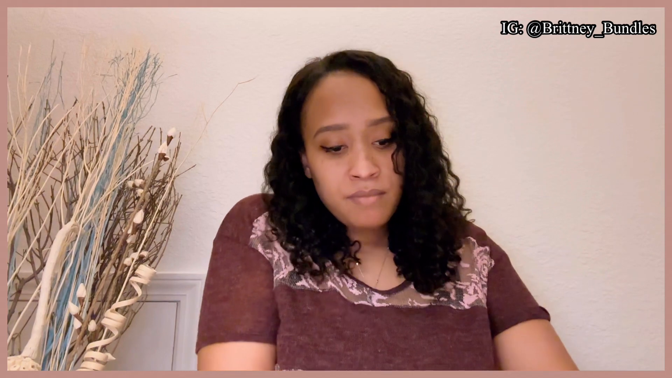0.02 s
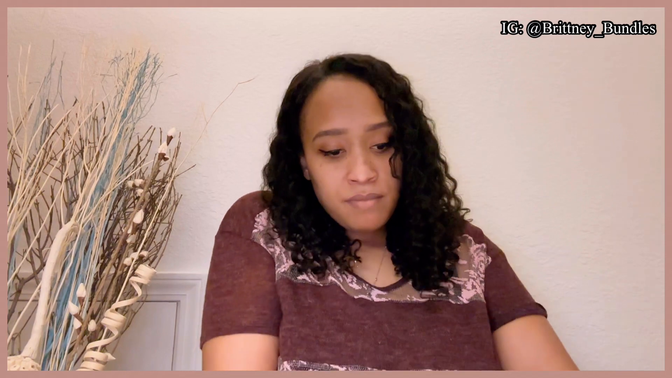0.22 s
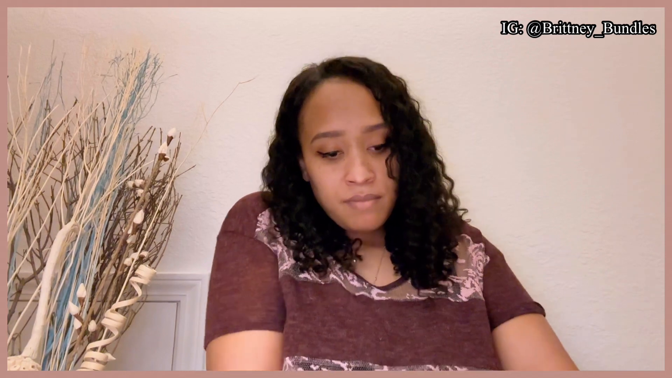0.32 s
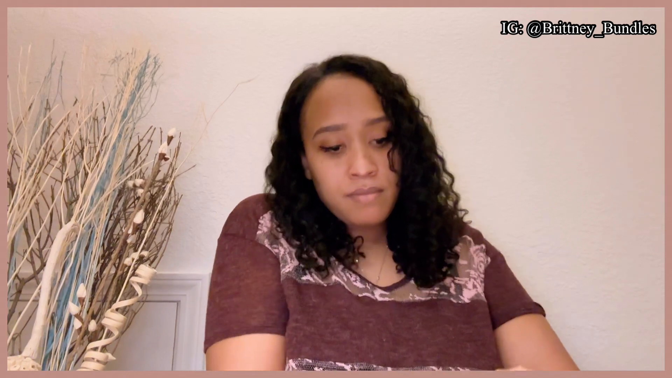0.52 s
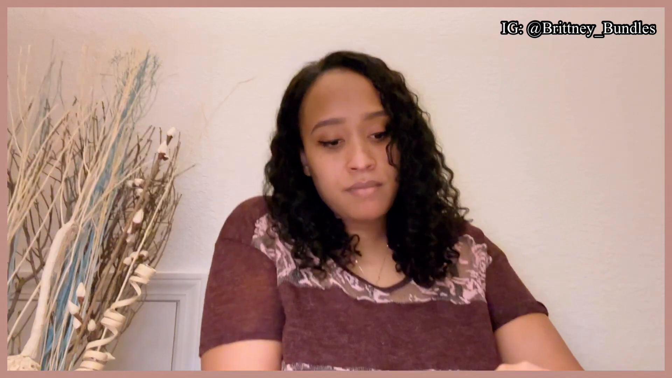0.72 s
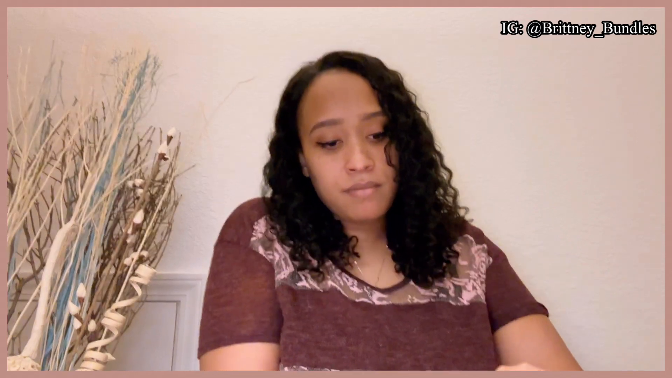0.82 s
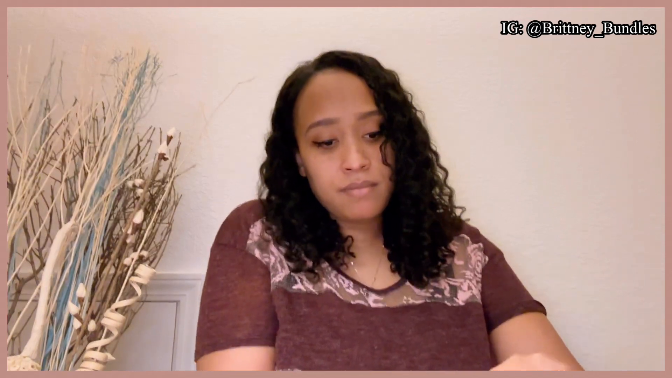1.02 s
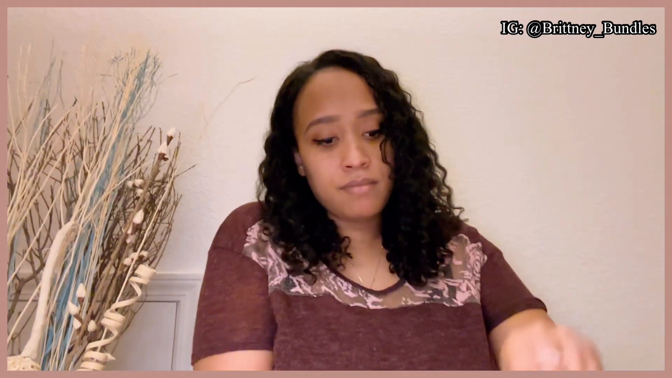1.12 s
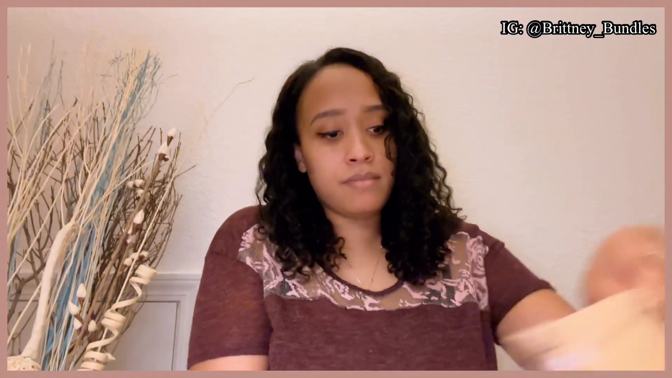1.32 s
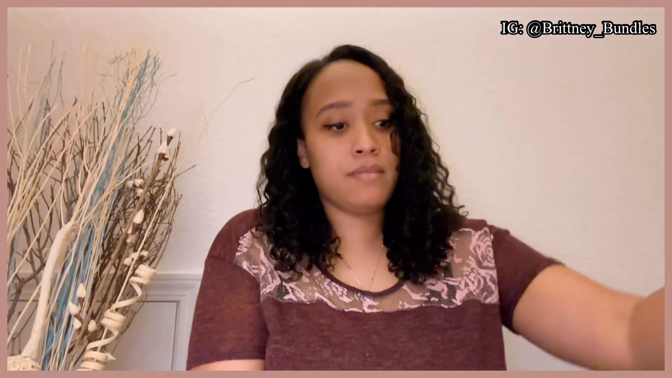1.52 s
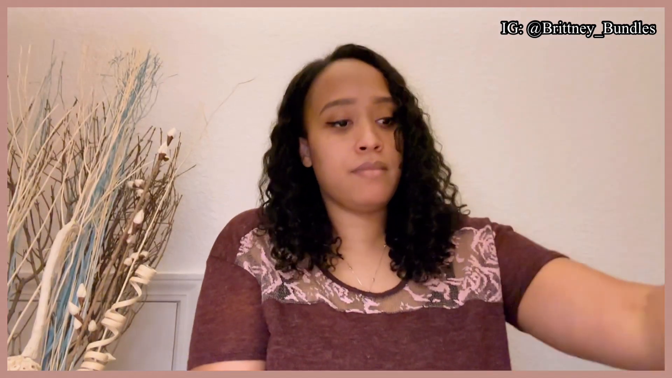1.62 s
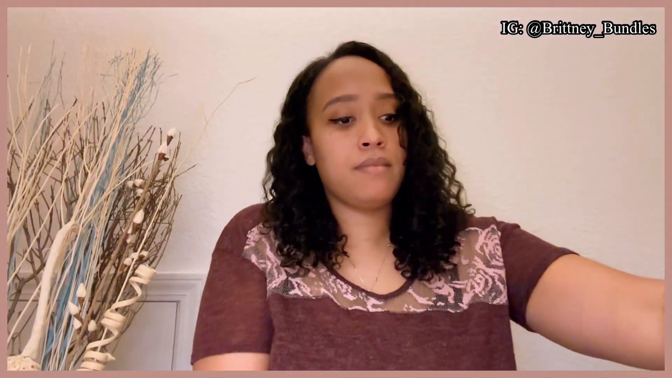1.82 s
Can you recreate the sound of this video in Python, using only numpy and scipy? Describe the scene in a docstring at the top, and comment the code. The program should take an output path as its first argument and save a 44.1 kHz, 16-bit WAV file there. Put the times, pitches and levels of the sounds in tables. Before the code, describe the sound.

Stiff paper mailer crackles: soft rustle, a burst of sharp snaps, then scattered crisp crinkles

```python
"""Soft rustle, then a burst of sharp snaps: a stiff paper mailer is bent and moved by hand on a table.
The room is small; the mailer lies off to the right of a phone with two microphone ports.
Creases snap as clicks with noise bursts, panels pop and the table thumps as damped modes;
friction grains make the rustle, a small piece of metal pings as a damped sine, steady noise is room tone.
The ports hear the paper some samples apart; decaying noise is the crackle, flutter and short wall tail."""
import sys
import numpy as np
from scipy import signal
from scipy.fft import rfft, irfft
from scipy.io import wavfile
from scipy.ndimage import map_coordinates

SR = 44100
rng = np.random.default_rng(int(sys.argv[2]) if len(sys.argv) > 2 else 0)


def to_linear_factor(level_db):
    """Convert decibel levels (scalar or array-like) to linear amplitude factors."""
    exponent = np.asarray(level_db, float) / 20
    return 10 ** exponent


def master(y):
    """Save y as 16-bit WAV."""
    cut = np.clip(np.atleast_2d(y).T, -1, 1)
    pcm = np.round(cut * 32767)  # scale
    wavfile.write(sys.argv[1], SR, pcm.astype(np.int16))


N = 83790

# creases snapping: start_s, crack_peak_db, crack_pitch_hz, treble_db (peak less TREBLE_CREST_DB)
CREASE_SNAPS = [(0.0393, -59, 4660, -68), (0.2335, -32, 1950, -60), (0.2404, -28, 3800, -51),
                (0.2445, -25, 2700, -50), (0.2455, -5.5, 5560, -22.5), (0.2577, -17, 3540, -36),
                (0.2667, -16.5, 2720, -40), (0.3458, -18, 1880, -24.5), (0.3844, -34.5, 2300, -24),
                (0.48, -53, 2770, -37.5), (0.5043, -34.5, 1950, -60), (0.556, -32.5, 3160, -72),
                (0.6182, -49, 2000, -40.5), (0.677, -38, 2980, -63), (0.6965, -42, 6000, -39),
                (0.8289, -25, 5010, -35), (0.8457, -32, 5700, -34), (0.8491, -9.5, 5700, -10.5),
                (0.8605, -35, 3500, -47), (0.8731, -38, 3370, -28), (1.002, -55, 3470, -62),
                (1.01, -29, 5500, -55), (1.011, -35, 3840, -55), (1.0343, -31, 6370, -60),
                (1.034, -36, 4200, -47), (1.0676, -25.5, 5440, -57), (1.1625, -37.5, 4300, -42),
                (1.1945, -33.5, 4300, -70), (1.2629, -34.5, 3120, -56), (1.284, -35, 5500, -39.5),
                (1.298, -40.5, 5400, -60), (1.338, -38, 2470, -64), (1.3473, -30, 3080, -55),
                (1.468, -56, 2160, -56), (1.5107, -19.5, 3720, -35), (1.5105, -25, 2200, -52),
                (1.571, -43, 2800, -42), (1.6389, -22, 3220, -59), (1.637, -27, 5560, -55),
                (1.6495, -32, 1990, -64), (1.668, -40, 3200, -64), (1.7397, -26.5, 1830, -59),
                (1.7408, -32, 3600, -63), (1.8564, -23, 6900, -40), (1.86, -34, 2900, -40)]
# modes of one crack: pitch_ratio, level_db
CREASE_MODES = [(0.92, 1.5), (0.662, 1), (0.3, -1.5), (1.51, -8.5), (3, -14)]
# crackle and echo after stronger creases: start_s, initial_rms_db, centre_hz, treble_initial_rms_db, t60_s
AFTER_CRACKLES = [(.228, -41, 3420, -56, 0.21), (0.242, -23.5, 3200, -49, 0.087),
                  (.247, -38.5, 3370, -41, 0.41), (.257, -28.5, 3030, -42, .3),
                  (0.345, -40, 2450, -48, 0.12), (.385, -50, 2800, -46.5, 0.43),
                  (0.554, -44, 2280, -54, 0.047), (.62, -75, 3000, -56, 0.12),
                  (.68, -46.5, 2540, -48.5, 0.35), (0.829, -50, 3970, -46, 0.37),
                  (0.85, -34.5, 2800, -39, 0.34), (0.871, -48, 3000, -42.5, 0.34),
                  (1.012, -47, 2870, -55, 0.23), (1.069, -60, 3950, -70, 0.23),
                  (1.194, -59, 2000, -63, 0.14), (1.348, -48, 2440, -54.5, 0.12),
                  (1.511, -36.5, 1770, -70, 0.079), (1.572, -61, 1490, -53, 0.13),
                  (1.638, -44, 2630, -56, 0.14), (1.741, -47.5, 2020, -79, 0.12),
                  (1.856, -50, 3066, -50.5, 0.19)]
# panels popping: start_s, peak_db, settled_pitch_hz, ring_t60_s, flutter_re_peak_db, extra_start_pitch_share
PANEL_POPS = [(.233, -42.5, 654, 0.045, -14, 0.85), (0.2441, -29.5, 622, 0.022, -4.5, 1.02),
              (.257, -26, 231, 0.045, -7.5, 1.18), (0.2574, -30, 486, 0.016, -3, .3),
              (0.2641, -30.5, 235, 0.11, -6.5, 0.38), (.3445, -22, 667, 0.031, -21, 0.27),
              (.352, -35, 633, .03, -33, 0.22), (.38, -37, 689, 0.084, -21, 0.085),
              (.429, -47.5, 453, 0.026, -1, 1.2), (.505, -45, 218, 0.018, -16, 1.8),
              (.554, -36, 500, 0.016, -14.5, 1.93), (0.614, -53, 195, 0.13, -34, 0.38),
              (.716, -39, 980, .02, -16, 0.25), (.718, -36, 465, 0.05, -12.5, 1.75),
              (.734, -38, 624, 0.026, -21, 1.46), (0.847, -26.5, 490, 0.029, -10.5, 0.84),
              (.899, -37, 395, 0.051, -12, 1), (0.941, -33, 483, 0.022, -15.5, 1.5),
              (1.0102, -37.5, 640, 0.013, -13, 0.45), (1.06, -48, 558, 0.044, -10, .3),
              (1.083, -38.5, 577, 0.032, -11.5, 0.32), (1.106, -39, 634, 0.018, -25, 0.22),
              (1.115, -42.5, 442, .02, -20, 0.53), (1.159, -43.5, 480, 0.019, -32, 0.47),
              (1.19, -46, 198, 0.044, -15, 0.45), (1.192, -33.5, 577, 0.0079, -15.5, 1.8),
              (1.2383, -38.5, 420, 0.012, -17, 1.9), (1.259, -46.5, 195, .031, -16, 0.31),
              (1.344, -47, 634, .022, -5, 0.76), (1.409, -47.5, 418, 0.042, -14, 1),
              (1.478, -42.5, 494, 0.024, -8.5, 0.81), (1.5095, -23.5, 349, 0.0077, -14.5, 2.86),
              (1.5221, -17, 1176, 0.0074, -21.5, 0.041), (1.524, -33.5, 308, 0.041, -18, 0.086),
              (1.544, -44.5, 307, 0.044, -3.5, 0.63), (1.5689, -25, 412, 0.017, -15, 1.72),
              (1.58, -24.5, 1070, 0.0068, -30, 0.08), (1.581, -43, 414, 0.018, -15, .1),
              (1.604, -43, 292, 0.033, -16, 1.04), (1.636, -28.5, 915, 0.017, -17, 0.084),
              (1.639, -42, 380, 0.013, -15, 0.52), (1.648, -38, 980, 0.0092, -21, 0.11),
              (1.7035, -41.5, 490, 0.019, -22, 0.79), (1.738, -31.5, 504, 0.009, -16, 1.2),
              (1.7415, -32, 798, 0.02, -27, .1), (1.746, -38, 410, 0.0092, -28, 0.18),
              (1.855, -47.5, 216, 0.072, -5.5, 0.69), (1.8565, -40, 840, .02, -11.5, 0.33)]
# table thumps: start_s, peak_db, main_pitch_hz, ring_t60_s
TABLE_THUMPS = [(0.252, -28.5, 98, 0.076), (0.301, -43, 47.7, 0.22), (0.37, -58, 91, 0.049),
                (0.465, -54, 182, 0.093), (0.499, -57, 146, 0.077), (0.555, -52.5, 195, 0.13),
                (0.734, -45.5, 96.2, 0.41), (0.779, -54, 100, 0.15), (0.844, -32.5, 99, 0.26),
                (0.929, -39, 84, 0.11), (1.111, -43, 151, 0.039), (1.249, -53, 138, 0.11),
                (1.53, -57, 113, 0.1), (1.59, -49.5, 116, 0.16), (1.745, -51.5, 92.5, 0.099)]
# metal pings: start_s, peak_db, t60_s
METAL_PINGS = [(1.019, -48.5, 0.14), (1.041, -62, 0.054), (1.103, -55, 0.088), (1.181, -60, 0.1)]
# direct rustle rms before pan and top cut: time_s, body_db, middle_db, treble_db, rumble_db
RUSTLE_LEVELS = [(0.0, -73, -68.5, -72.5, -82), (0.152, -63, -66.5, -54.5, -74),
                 (0.274, -56, -61.5, -64, -78), (0.338, -61, -43, -62, -48), (0.402, -70, -55.5, -48, -57),
                 (0.476, -84, -61.5, -100, -65), (0.672, -63, -59, -56.5, -68.5),
                 (0.788, -61, -57.5, -54.5, -64), (0.894, -61, -48.5, -65, -60.5),
                 (0.962, -60.5, -55, -70, -61), (1.196, -65.5, -61.5, -59.5, -59),
                 (1.332, -67.5, -61, -68.5, -64.5), (1.48, -61, -63.5, -55.5, -66.5),
                 (1.634, -58, -74, -57.5, -69), (1.714, -58.5, -53, -56.5, -70.5),
                 (1.9, -85, -74.5, -76, -68.5)]
# body, middle, treble, rumble filters: centre_hz, first_pass_width_hz
RUSTLE_FILTERS = [(2830, 3600), (600, 695), (9600, 11000), (102, 256)]
# grain decay per rustle band: time_constant_s
GRAIN_DECAYS_S = [0.0029, 0.00085, 0.0039, 0.0091]
# diffuse sound re direct, per rustle band: level_db
DIFFUSE_LEVELS_DB = [0, 2, -13, -2]
# lateness of the left port below the split: time_s, lag_samples
PORT_LAG = [(0, 8.8), (.9, 9.07), (1.2, 11.35), (1.5, 14.4), (1.9, 18.8)]
# room tone spectrum shape: frequency_hz, relative_level_db
TONE_SHAPE = [(24, -56), (40, -40), (502, -16), (693, -63), (866, -20), (2110, 7), (2390, 2), (4790, 2),
              (7870, -8.5), (15000, -27)]

SPLIT_HZ, TREBLE_LAG_SAMPLES = 7600, 4.12
PAN_DB, TREBLE_PAN_DB, BASS_PAN_DB = -4.5, -0.2, -3.5  # left re right
SNAP_DECAY_S, SNAP_Q = 0.0004, 2.88
TREBLE_HZ, TREBLE_WIDTH_HZ, TREBLE_CREST_DB = 12100, 10500, 9
AFTER_RISE_S, CRACKLE_GRAIN_DB = 0.003, 2.8
POP_DELAY_S, POP_RISE_S, POP_PARTIAL_RATIO, POP_PARTIAL_DB = 0.0015, 0.00052, 1.81, -9.5
GLIDE_CYCLES, HOLD_CYCLES, FLUTTER_T60_S = 0.57, 1.52, 0.18
THUMP_RISE_S, PING_RISE_S, PING_HZ = 0.0025, 0.0013, 11020
GRAINS_PER_S, GRAIN_SPREAD_DB = 2500, 2.5
TONE_RMS_DB = -62.5  # before the top cut
STEADY_TOP_HZ, TOP_HZ = 14300, 16200


def snaps():
    """Crease: a click plus sub-millisecond noise drives crack modes; a like burst drives the treble."""
    out, t = np.zeros((2, N)), np.arange(400) / SR
    noise = rng.standard_normal((len(CREASE_SNAPS), 2, len(t)))
    for (s, db, hz, treble_db), z in zip(CREASE_SNAPS, noise):
        push = z * np.exp(-t / SNAP_DECAY_S) * 0.43 + 2 * (t == 0)
        crack = 0
        for ratio, mode_db in CREASE_MODES:
            mode_hz = hz * ratio
            if mode_hz < SPLIT_HZ:
                crack = crack + to_linear_factor(mode_db) * steep(push[0], mode_hz, mode_hz / SNAP_Q)
        treble = steep(push[1], TREBLE_HZ, TREBLE_WIDTH_HZ)
        add(out, s + 0.000829, crack, db, PAN_DB)
        add(out, s + 0.000785, treble, treble_db + TREBLE_CREST_DB, PAN_DB)
    return out


def crackles():
    """Crackle and echo after creases: noise of uneven level in two bands, swelling and decaying."""
    out = np.zeros((2, N))
    noise = rng.standard_normal((len(AFTER_CRACKLES), 4, SR // 4))
    for (s, db, hz, treble_db, t60_s), z in zip(AFTER_CRACKLES, noise):
        steps = np.repeat(z[3], 64)[:SR // 4]  # one random level per 64 samples
        grains = z[:3] * to_linear_factor(CRACKLE_GRAIN_DB * steps)
        out += after(s, grains, hz, 1.35 * hz, db, t60_s, DIFFUSE_LEVELS_DB[0])
        out += after(s, grains, TREBLE_HZ, TREBLE_WIDTH_HZ, treble_db, t60_s, DIFFUSE_LEVELS_DB[2])
    return out


def pops():
    """Panel flip: a main mode gliding down, a weaker higher mode, then flutter as decaying noise."""
    out = np.zeros((2, N))
    noise = rng.standard_normal((len(PANEL_POPS), 3, SR // 5))
    for (s, db, hz, t60_s, flutter_db, glide), z in zip(PANEL_POPS, noise):
        # same decay time; the main mode holds for HOLD_CYCLES first, the higher mode fades at once
        main = ring(hz, t60_s, POP_RISE_S, glide, HOLD_CYCLES)
        partial = ring(hz * POP_PARTIAL_RATIO, t60_s, POP_RISE_S)
        add(out, s + POP_DELAY_S, main + to_linear_factor(POP_PARTIAL_DB) * partial, db, PAN_DB)
        out += after(s, z, 1.023 * hz, 1.13 * hz, db + flutter_db, FLUTTER_T60_S, DIFFUSE_LEVELS_DB[1])
    return out


def thumps():
    """Table: three low damped modes per thump."""
    out = np.zeros((2, N))
    for s, db, hz, t60_s in TABLE_THUMPS:
        main = ring(hz, t60_s, THUMP_RISE_S)
        lower = ring(hz * 0.59, t60_s, THUMP_RISE_S)
        upper = ring(hz * 1.3, t60_s, THUMP_RISE_S)
        add(out, s, main + 0.44 * lower + 0.386 * upper, db, BASS_PAN_DB)
    return out


def pings():
    """Small metal piece: one high damped mode per ping."""
    out = np.zeros((2, N))
    for s, db, t60_s in METAL_PINGS:
        add(out, s, ring(PING_HZ, t60_s, PING_RISE_S), db, PAN_DB)
    return out


def rustle():
    """Friction: dense uneven noise grains in four bands, part direct, part diffuse."""
    t, levels, out = np.arange(N) / SR, np.array(RUSTLE_LEVELS), 0
    hits = (rng.random(N) < GRAINS_PER_S / SR) * to_linear_factor(GRAIN_SPREAD_DB * rng.exponential(size=N))
    bands = zip(RUSTLE_FILTERS, GRAIN_DECAYS_S, DIFFUSE_LEVELS_DB)
    for k, ((hz, width_hz), decay_s, diffuse_db) in enumerate(bands):
        env = signal.lfilter([1], [1, -np.exp(-1 / (decay_s * SR))], hits)
        gain = to_linear_factor(np.interp(t, levels[:, 0], levels[:, k + 1]))
        grains = steep(env * rng.standard_normal((3, N)), hz, width_hz)
        direct, diffuse_left, diffuse_right = gain * unit(grains)
        if hz > SPLIT_HZ:
            lag, pan_db = TREBLE_LAG_SAMPLES, TREBLE_PAN_DB
        else:
            lag, pan_db = np.interp(t, *np.array(PORT_LAG).T), PAN_DB
        late = map_coordinates(direct, [np.arange(N) - lag], mode="mirror")
        left = late + to_linear_factor(diffuse_db) * diffuse_left
        right = direct + to_linear_factor(diffuse_db) * diffuse_right
        out = out + np.array([left, right]) * to_linear_factor(np.array([[pan_db], [-pan_db]]) / 2)
    return out


def room_tone():
    """Steady shaped noise: a part common to both ports plus separate parts, weaker in the treble."""
    hz, shape = np.fft.rfftfreq(N, 1 / SR) + 1, np.array(TONE_SHAPE)  # +1 avoids log(0)
    weight = to_linear_factor(np.interp(np.log(hz), np.log(shape[:, 0]), shape[:, 1]))
    z = rfft(rng.standard_normal((3, N))) * weight
    common = ports(irfft(z[0], N), 0, 0.5)[:, :N]
    separate = irfft(z[1:] * np.where(hz < SPLIT_HZ, 0.6, 0.2), N)
    return to_linear_factor(TONE_RMS_DB) * unit(common + separate)


def ring(hz, t60_s, rise_s, glide=0, hold_cycles=0):
    """Damped mode, soft start; may start high, drop to its pitch and hold before fading."""
    t60_s, drop_s, hold_s = max(t60_s, 0.004), GLIDE_CYCLES / hz, hold_cycles / hz
    t = np.arange(int(t60_s * SR) + SR // 50) / SR
    turns = hz * (t + glide * drop_s * (1 - np.exp(-t / drop_s)))
    fade = np.exp(-np.log(1000) * np.maximum(t - hold_s, 0) / t60_s)
    return np.sin(2 * np.pi * turns) * fade * (1 - np.exp(-t / rise_s))


def after(s, z, hz, width_hz, db, t60_s, diffuse_db):
    """Noise that swells in after an event and dies away, direct plus diffuse."""
    t, i = np.arange(z.shape[1]) / SR, int(s * SR)
    swell = (1 - np.exp(-t / AFTER_RISE_S)) ** 2
    v = unit(dull(steep(z, hz, width_hz))) * to_linear_factor(db - 60 * t / t60_s) * swell
    out = np.zeros((2, N + len(t)))
    out[:, i:i + len(t)] = ports(v[0], s, PAN_DB)[:, :len(t)] + to_linear_factor(diffuse_db) * v[1:]
    return out[:, :N]


def ports(sound, s, pan_db):
    """Two ports by phase and level: left is late, less so in the treble."""
    size = len(sound) + 32
    cycles = np.fft.rfftfreq(size)  # per sample
    low = cycles * SR < SPLIT_HZ
    half = to_linear_factor(np.where(low, pan_db, TREBLE_PAN_DB) / 2)
    lag = np.where(low, np.interp(s, *np.array(PORT_LAG).T), TREBLE_LAG_SAMPLES)
    late = np.exp(-2j * np.pi * cycles * lag)
    spec = rfft(sound, size)
    return irfft(np.array([spec * half * late, spec / half]), size)


def add(out, s, sound, db, pan_db):
    """Mix in a sound scaled to peak db before panning."""
    i = int(s * SR)
    v = ports(sound * to_linear_factor(db) / np.abs(sound).max(), s, pan_db)[:, :N - i]
    out[:, i:i + v.shape[1]] += v


def band(x, hz, width_hz):
    """Two-pole band-pass."""
    return signal.lfilter(*signal.iirpeak(hz, hz / width_hz, fs=SR), x)


def steep(x, hz, width_hz):
    """Band-pass twice, the second pass twice as wide."""
    return band(band(x, hz, width_hz), hz, 2 * width_hz)


def unit(x):
    """Scale to rms 1."""
    return x / np.sqrt(np.mean(x ** 2))


def dull(x):
    """Low-pass for the rustle, noise tails and room tone."""
    return signal.sosfilt(signal.butter(12, STEADY_TOP_HZ, fs=SR, output="sos"), x)


def scene():
    """Paper, table and metal over the room tone."""
    return snaps() + crackles() + pops() + thumps() + pings() + dull(rustle() + room_tone())


def roll_off(x):
    """The treble ends steeply here."""
    return signal.sosfilt(signal.butter(12, 17120, fs=SR, output="sos"), x)


def record(dry):
    """Phone: cuts the deepest bass and rolls off the top."""
    x = signal.sosfilt(signal.butter(4, 40, "high", fs=SR, output="sos"), dry)
    x = signal.sosfilt(signal.butter(10, TOP_HZ, fs=SR, output="sos"), x)
    return roll_off(x)


dry = scene()
out = record(dry)
master(out)
```